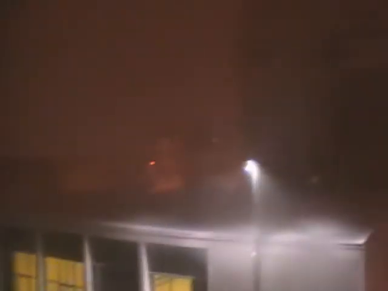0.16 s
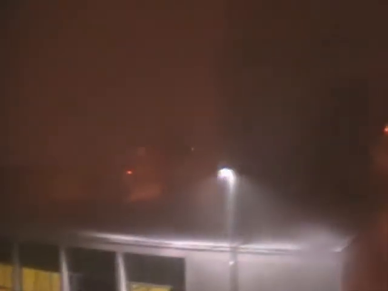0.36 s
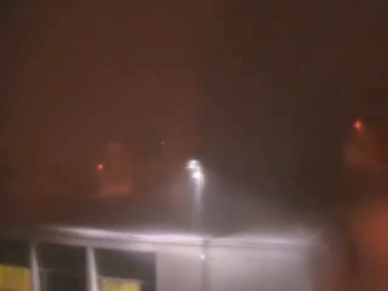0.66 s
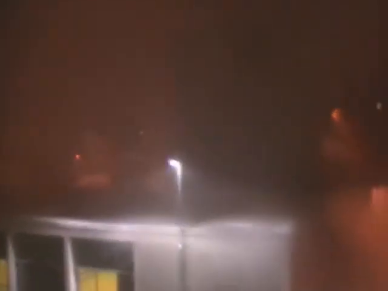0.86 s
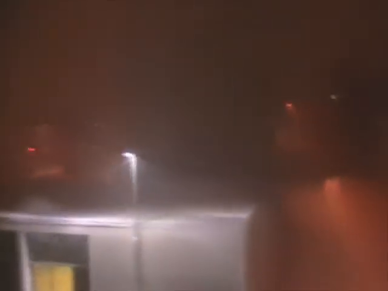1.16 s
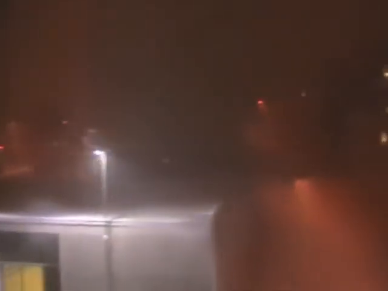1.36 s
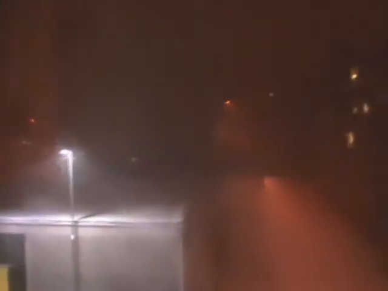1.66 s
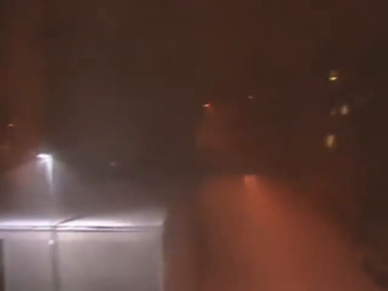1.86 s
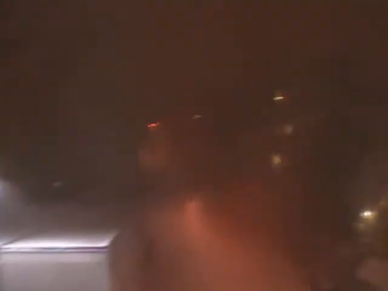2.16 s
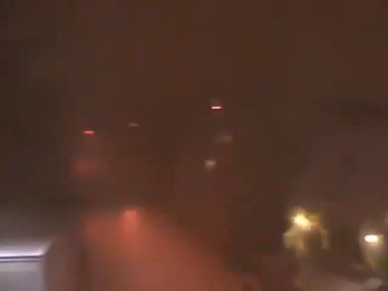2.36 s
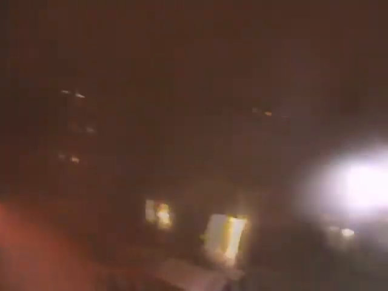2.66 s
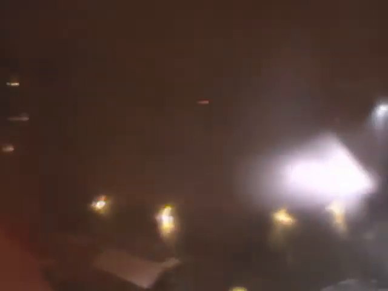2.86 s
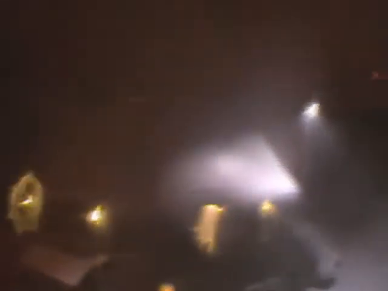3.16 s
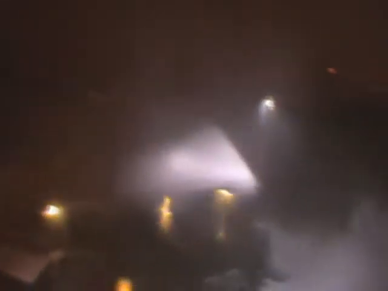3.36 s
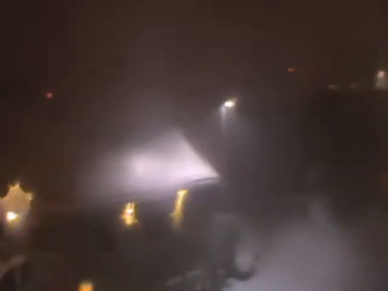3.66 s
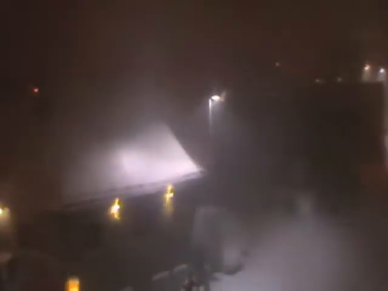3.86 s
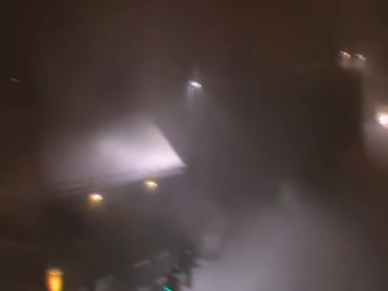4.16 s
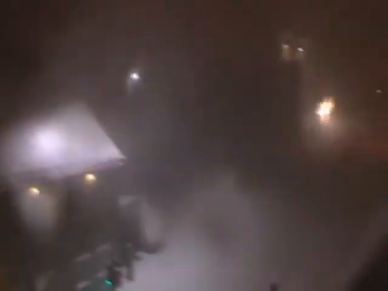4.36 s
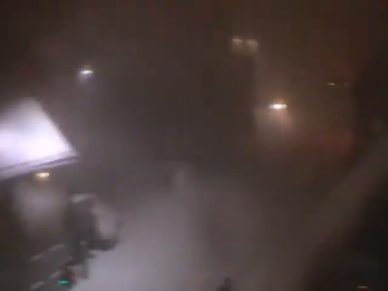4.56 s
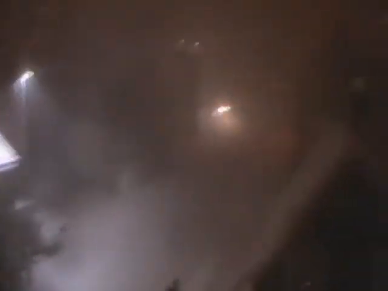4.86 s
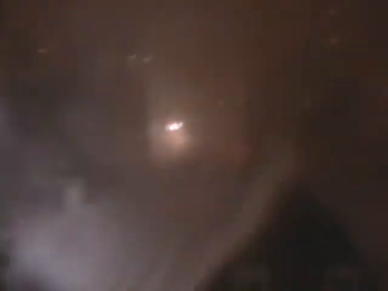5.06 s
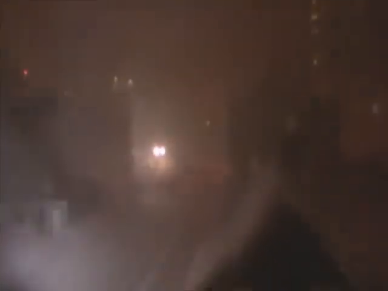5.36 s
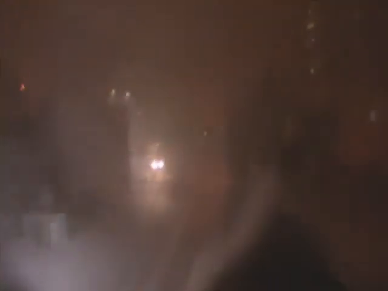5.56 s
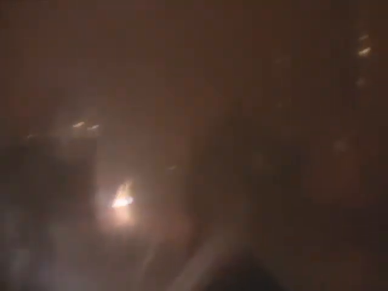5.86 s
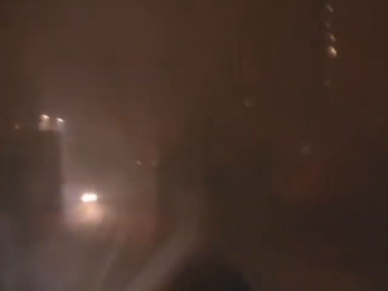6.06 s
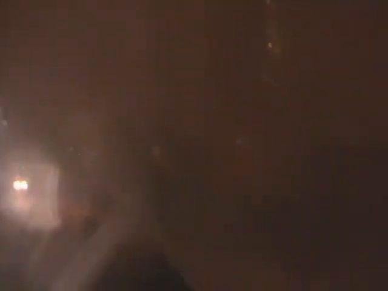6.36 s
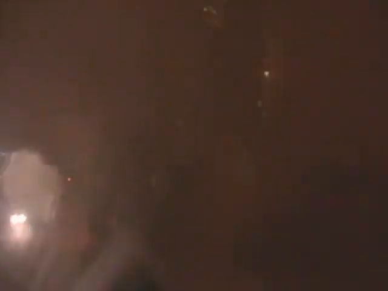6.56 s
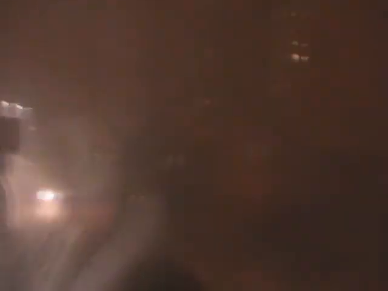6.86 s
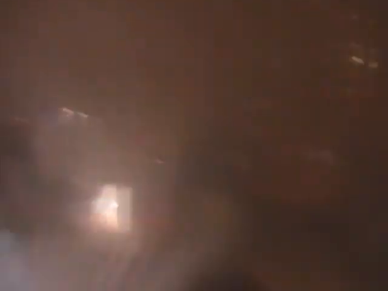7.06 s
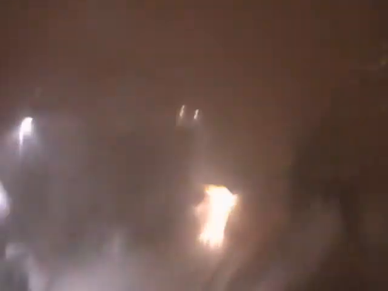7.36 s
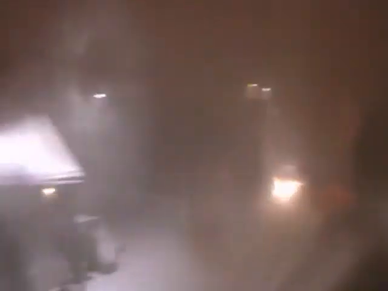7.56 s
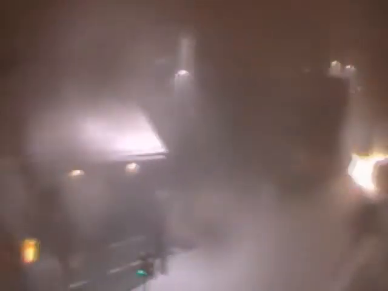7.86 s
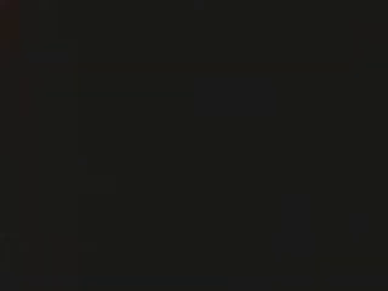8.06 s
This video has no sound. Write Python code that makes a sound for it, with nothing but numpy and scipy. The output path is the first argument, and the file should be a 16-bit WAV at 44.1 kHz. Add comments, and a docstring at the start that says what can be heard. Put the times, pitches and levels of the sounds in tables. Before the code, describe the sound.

Night blizzard outdoors: low wind rumble and fluttering blasts first, then hard, crisp ice ticks scattering across the microphone casing, with a distant smooth roar.

```python
"""A blizzard at night: buffeting wind, tearing rasps and sharp ice ticks at a small camera out in the open.
Gusts shape low noise at the two microphone ports and a fluttering rasp at the casing; single eddies slap in puffs.
Ice pellets are short noise blows through resonances, with a faint grainy halo round the large ones and a few rings.
Fine snow hisses past as noise and tiny clicks; further off the storm is a smooth roar with gliding wind tones."""
import sys
import numpy as np
from scipy import signal
from scipy.fft import rfft, irfft, next_fast_len
from scipy.io import wavfile
from scipy.ndimage import uniform_filter1d

SR = 44100
rng = np.random.default_rng(int(sys.argv[2]) if len(sys.argv) > 2 else 0)


def waveform_to_disk(signal):
    """Save audio, clipped to [-1, 1], as 16-bit WAV at the path in sys.argv[1]."""
    frames = np.transpose(np.atleast_2d(signal))
    scaled = np.clip(frames, -1, 1) * 32767
    samples = np.round(scaled).astype(np.int16)
    wavfile.write(sys.argv[1], SR, samples)


N = 362502
TIME = np.arange(N) / SR

# thickness of the fine driven snow: t/s, level/dB before the layer trims
SNOW_LEVEL = [(0, -70.5), (.4, -72.5), (.6, -67), (1.25, -64.5), (1.9, -70), (2.4, -63.5), (3.3, -67),
              (3.55, -60.5), (3.85, -60.5), (4.7, -62), (5.55, -62), (5.75, -67), (6.4, -65), (6.6, -58.5),
              (7.35, -64), (8.15, -55)]
THICK_SNOW_DB = -59  # snow level that counts as thick
# large ice pellets on the casing; knock and ring pitch are set separately for each pellet:
# t/s, level/dB, knock/Hz, ring/Hz, ring/dB, body/dB, crack/dB (all three relative to the knock), left over right/dB
LARGE_PELLETS = [(1.2324, -40.5, 1800.0, 7300, 3, 16, 7, 2.5), (1.83, -29.5, 1780, 7230.0, -9, 15, -14, 14),
                 (1.8743, -58, 1800.0, 2790.0, 17, 9, -15, 7.5),
                 (1.9944, -49, 1770, 2880, -19, -22.5, -29, 9.5), (2.567, -26, 2460, 2420, 1, 0, -14, -3),
                 (2.6015, -32.5, 4720.0, 2320, 12, 11, 2, 7), (2.715, -38, 2100, 7200, -8, 13, 6, 0),
                 (2.7358, -27.5, 2910, 5900, -5, 2, -2, -6), (2.8633, -30, 4640, 3700, 2.5, 4.5, -3.5, -7),
                 (3.0838, -19, 6700, 3540, 11, 6.5, 10.5, -1.5), (3.1456, -29, 2100, 3780, 4, -1, -2, -4.0),
                 (3.1839, -15.5, 3470, 3620, 6.5, 4, 1, 0), (3.1905, -12, 2860, 1640, 1.5, 4.5, -2.5, -5),
                 (3.2265, -37, 3400, 4800, -10, -21.5, -7, -2.5),
                 (3.325, -34, 2350, 3070, -13, 16, -31, -3), (3.4017, -22, 2030, 2200, -8, -6, -3.5, 4.5),
                 (3.449, -41, 3380, 5000, -16, -8, 2, -8), (3.626, -45.5, 4020.0, 5060, -3, -16.5, 4, -12),
                 (3.7832, -17.5, 2500, 4400, -2.5, 0.5, -1, 5), (3.822, -37, 3400, 3700, -4, 4, 0, 0),
                 (3.895, -14, 4720.0, 3000.0, 4, 6.5, 0.5, -4.5),
                 (3.9717, -34, 5540.0, 1490, 15, 6, -11, 0), (4.154, -40.5, 2900, 3700, -12, 0, 2, -1),
                 (4.209, -39, 2900, 3730, -5, 1, -6, 1), (4.244, -36.5, 2910.0, 5200.0, -11, -16, -6, -2.0),
                 (4.291, -36.5, 4020.0, 8300, -17, 6, -23, 0), (4.361, -43, 4000, 3630, 2, -17, 2, -2),
                 (4.576, -38, 2900, 3700, -7, 4, -7, -1), (4.5909, -34, 2910.0, 7460, -15, 3, -9, -9),
                 (4.6041, -18, 2040, 4740, -3, -12, -4.5, 10), (4.7232, -33, 2090, 7300, -7.0, -1, -4, -1),
                 (4.779, -32, 3400, 4970, 0, 7, -4, 0), (4.7844, -18.5, 2080, 6250, -10, -6, -2.5, 6),
                 (4.7973, -31, 2480.0, 2920, 16, 4, -11, -12),
                 (4.901, -43, 6500.0, 5390.0, -4, 4, -19.0, -8),
                 (4.9099, -34, 1800.0, 7230.0, -14, 14, 4.0, 1),
                 (5.021, -29.5, 1800, 4500, -15, 9, -11, -2), (5.033, -52, 4700, 6000, -5, -12, 0, -2),
                 (5.0501, -14.5, 1840, 6320, -5.5, 1.5, -4.5, -2),
                 (5.157, -40, 2110.0, 3460, 2.5, 6, 10, -3),
                 (5.2165, -37.5, 2910.0, 2500.0, -4, -13, 7, 0.0),
                 (5.2672, -36.5, 1790, 3300, -12, -26, -7, 10),
                 (5.287, -38.5, 2480.0, 7780.0, -2, -13.5, 7, -3),
                 (5.3305, -17.5, 1970, 4770, -3, -25, -8.5, 5), (5.42, -33.5, 2900, 7230.0, -15, 1, -8, 7),
                 (5.489, -43.5, 3400, 7200, -5, -1, 0, 1), (5.548, -25.5, 2140, 5740, -12, -7, -14, 9),
                 (5.575, -40, 3400, 7200, -5, -7, 4, 1), (5.595, -23, 3260, 2540, -1, -8, -9, 11),
                 (5.615, -35, 1800.0, 5600, -10, -13.0, 3, -15),
                 (5.628, -31, 2100, 7780.0, -22, -1, -4, -5), (5.774, -16, 5600, 2770, -2.5, -8, -3, 3),
                 (5.792, -12.5, 4520, 2650, -7, -12.5, -20, -1.5),
                 (5.8735, -30.5, 2480.0, 4970, 5.5, -10.0, 4.5, 8),
                 (5.9016, -37.5, 2930, 8900, -12.0, -15, -8.0, 8),
                 (5.919, -34.5, 2110.0, 5840, -9, -13, -10, -8),
                 (5.9633, -29.5, 5540.0, 5200.0, -13, -5, -20.5, -4),
                 (5.9741, -18, 1810, 4350, -4.5, -7, -4, 7), (5.9789, -23, 4720.0, 2790.0, -11, -17, -1, 7),
                 (5.999, -34, 1800.0, 3120.0, -2, -25, -3, -5), (6.0677, -29, 1760, 2800, -9, -14, 2.5, -4),
                 (6.131, -43, 4000, 4600, -14, -10, -5, 1), (6.161, -24.5, 1760, 4300, -10, 2, -6, 9),
                 (6.181, -38, 2400, 3200, -6, 7, -18, -6), (6.236, -16, 4860, 2460, -4, -2.5, -3, 7.5),
                 (6.3031, -21.5, 3400, 7840, -5, -12, -8, 13), (6.306, -23.5, 5750, 3000, -7, -10, -24, -6),
                 (6.3509, -36, 1780, 2400, -2, 3, -29, -5), (6.58, -31.5, 4640, 8600, -8, -22.5, -21, 9),
                 (6.5925, -33, 3420.0, 4660.0, -8, -14, -4, 14),
                 (6.6023, -31.5, 1800.0, 2880, 7, 1, -9.0, -1),
                 (6.6507, -40.5, 2910.0, 6500, -5.5, -20.0, -1.5, 8),
                 (6.753, -26.5, 2110.0, 4490.0, -10, -12, 5, -12),
                 (6.7623, -29, 2910.0, 4570, -7, -1, -7, 11), (6.798, -46, 3400, 3700, -2, -12, -16, 3),
                 (6.8353, -20.5, 3150, 4520, -8, -19, -7, 5.5), (6.936, -38.5, 3400, 7200, -5, 8, 6, -2),
                 (7.001, -42, 4000, 7300, 0, 3, 0, -4), (7.0603, -34, 2840, 4530, 1, 2, -13, 11.5),
                 (7.079, -36.5, 2110.0, 5010.0, -17, -22.0, -10, -7),
                 (7.0953, -28.5, 4900, 2600.0, -2, -7, -11, 12),
                 (7.231, -31, 2910.0, 7230.0, -11, -13, -22.0, 10),
                 (7.2398, -10, 3370, 2460, 11, 10, -3.5, 0.5), (7.245, -19.5, 2910.0, 4600, 1, 2.5, -4, 30),
                 (7.264, -34, 4720.0, 2240.0, -1, -10.5, 5, -5.0), (7.287, -35, 2100, 6200, -5, 16, 6, 1),
                 (7.3, -39.5, 4000, 4600, -1, -8, -1, 11), (7.322, -23.5, 1800.0, 4530, -12, -1, -16, 10.0),
                 (7.3376, -10.5, 5400, 2400, -2.5, -3, -24, 0),
                 (7.364, -31.5, 2870, 5050, -2, -19.5, -5, 11), (7.375, -38, 2900, 3700, -5, 2, -10, 2),
                 (7.407, -10, 4600, 8200, -10, 1, -22, -1), (7.4146, -22, 2930, 5700, 1, -1, 2, -3),
                 (7.477, -33, 2450, 9000.0, -20, -5, -18, 6), (7.525, -37.5, 4150, 1670.0, -4, -12, -5, 20),
                 (7.647, -48, 3400, 5030, -9, -8, -4, 0), (7.7389, -17, 2860, 1580, 0, 2, -32, 7.5),
                 (7.786, -15, 2270, 7860, -14, -11, -15, 5), (7.8299, -21.5, 1790, 5960, -5, -1, -4, 5),
                 (7.835, -18.5, 3420.0, 1610.0, -5, -21, -4, 12),
                 (7.8596, -23.5, 5540.0, 3120.0, 5, 1, 1, 6), (7.9152, -23, 2430, 4870, -9, -3.5, -10, 7)]
# spectrum of air tearing off the casing: f/Hz, relative density/dB
TEARING_COLOUR = [(200, -45), (420, 6.5), (600, 3.5), (900, 4.5), (1200, 5.5), (1600, 2.5), (2400, -11),
                  (3300, -17), (5000, -36), (8000, -37.5), (13000, -86)]
# spectrum of fine snow, also used for the halo and the spray: f/Hz, relative density/dB
POWDER_COLOUR = [(1000, 9.5), (2500, 14), (3700, 11.5), (4800, 6), (6000, 6), (7500, 6.5), (9500, 1),
                 (11000, 1.5), (13000, 0)]


def wind():
    """Levels in dB of the buffeting and of the rasp: the short gusts add their power to the changing wind beneath."""
    # slowly and suddenly changing buffet level beneath the short gusts: t/s, level/dB
    base_buffet = [(0, -33.5), (.45, -36.5), (.9, -34), (1.15, -34), (1.72, -34.5), (2.15, -36),
                   (2.7, -35.5), (3.0, -32), (3.33, -49), (3.72, -50.5), (3.9, -28.5), (4.12, -33.5),
                   (4.35, -33.5), (5.0, -36), (5.1, -47), (5.36, -51.5), (5.5, -46), (6.6, -40.5),
                   (7.8, -47.5), (8.22, -75)]
    # slowly and suddenly changing rasp level beneath the short gusts: t/s, level/dB before the rasp trims
    base_rasp = [(0, -66.5), (.8, -65), (1.15, -49), (1.4, -66), (1.7, -60.5), (2.02, -38), (2.11, -39),
                 (2.175, -44), (2.22, -41), (2.52, -38.5), (2.7, -62), (3.4, -58), (4.5, -60.5), (5.7, -70),
                 (6.3, -58), (7.1, -58), (7.6, -56.5), (8.22, -55)]
    # short gusts on top: crest t/s, length/s, buffet level/dB, rasp level/dB before the rasp trims
    gust_rows = [(.01, 0.031, -27, -52), (1.085, 0.027, -32, -40), (1.242, 0.036, -30.5, -39),
                 (1.29, 0.084, -47, -48), (1.491, 0.052, -45, -44), (1.564, 0.099, -35.5, -49.5),
                 (1.873, 0.031, -46, -29.5), (1.991, 0.065, -39, -35.5), (2.18, 0.023, -28, -60),
                 (2.239, 0.041, -36, -26), (2.263, 0.021, -34, -25.5), (2.317, 0.053, -39.5, -28),
                 (2.538, 0.057, -36.5, -41.5), (2.876, 0.15, -33, -51.5), (3.292, 0.036, -39, -72),
                 (3.467, 0.028, -47, -70), (3.573, 0.046, -50, -72), (5.151, 0.051, -29, -55),
                 (5.263, 0.082, -30, -62), (5.568, 0.2, -32, -54.5), (5.706, 0.12, -33, -50),
                 (5.92, 0.14, -35, -59), (6.215, 0.12, -31, -49), (6.435, 0.045, -35.5, -70),
                 (6.569, 0.088, -32.5, -38.5), (6.672, 0.028, -37, -35), (6.729, 0.031, -31.5, -36),
                 (6.813, 0.046, -34.5, -65), (6.977, 0.056, -30.5, -43), (7.109, 0.027, -35.5, -39.5),
                 (7.241, 0.094, -35.5, -46), (7.45, 0.14, -39.5, -52), (7.552, 0.029, -30, -67),
                 (7.968, 0.11, -41, -69), (8.072, 0.035, -28, -33.5), (8.183, 0.15, -32.5, -45)]
    buffet_power = from_db(curve(base_buffet)) ** 2
    rasp_power = from_db(curve(base_rasp)) ** 2
    for crest_s, length_s, buffet_db, rasp_db in gust_rows:
        swell_power = surge(crest_s, length_s) ** 2
        buffet_power += from_db(buffet_db) ** 2 * swell_power
        rasp_power += from_db(rasp_db) ** 2 * swell_power
    return 10 * np.log10(buffet_power), 10 * np.log10(rasp_power)


def buffeting(buffet_db, rasp_db):
    """Lumpy low pressure swings, nearly the same at both ports; in fast air the eddies get smaller and lose bass."""
    # spectrum of the pressure swings: f/Hz, relative density/dB
    swing_colour = [(20, -69), (50, -57), (80, -25), (125, -13.5), (200, -4), (300, 0), (420, -2),
                    (505, -7), (580, -20), (700, -15.5), (1200, -43), (3000, -72)]
    lumps = from_db(2.7 * drift(38.7))
    eddies = steadied(coloured(stereo_noise(side_db=-28.0), swing_colour) * lumps)
    small = high_pass(eddies, 280, order=1)
    # the rasp level, smoothed over 0.2 s, stands for the speed of the air
    fast = np.clip((uniform_filter1d(rasp_db, size=8820) + 53.0) / 13, 0, 1)
    eddies = (1 - fast) * eddies + from_db(6.5) * fast * small
    return from_db(buffet_db) * eddies * panned(2.15)


def rasping(rasp_db):
    """Fluttering turbulence, separate at each port in the treble; the hardest blasts are denser and gain a bright edge."""
    apart_hz, side_db = 710, -1.5  # above this pitch each port has its own eddies
    lee_hz, left_db = 1290, 2.5  # the right port lies in the lee and hears a duller rasp
    # harder blasts flutter less
    flutter_db = np.interp(rasp_db, [-36, -28], [4.4, 1.8]) * drift(85)
    level_db = rasp_db - .5 + flutter_db - uniform_filter1d(flutter_db, size=2200)

    mid, side = rng.standard_normal((2, N))
    side = from_db(side_db) * high_pass(side, apart_hz, order=3)
    air = coloured(np.array([mid + side, mid - side]), TEARING_COLOUR)

    edge_colour = [(1000, -22), (2300, 10.0), (3300, -3.0), (5000, -16), (7000, -27.0), (13000, -59)]
    edge = coloured(stereo_noise(side_db=-0.5), edge_colour)
    edge_db = np.minimum(3.0 * (level_db + 27.5), -5)  # relative to the air noise
    left, right = air + edge * from_db(edge_db)
    right = right - 0.48 * high_pass(right, lee_hz, order=1)
    return from_db(level_db + 4.5) * np.array([left, right]) * panned(left_db)


def slaps():
    """An eddy bursts on the ports: a low puff that dies in a few cycles, with a tearing edge of its own level."""
    # single eddies: t/s, level/dB, puff f/Hz, tearing edge relative to the puff/dB
    slap_rows = [(.142, -35.5, 447, -1), (0.479, -40.5, 500, 7.5), (0.58, -27, 394, -15),
                 (.812, -47, 500, 9), (.952, -42, 500, 3), (1.09, -30, 450, -5), (1.146, -36, 480, -2),
                 (1.181, -39, 480, -1), (1.277, -36, 480, 2), (1.233, -40, 450, 5), (1.328, -45, 450, 10),
                 (1.356, -43, 500, 8.5), (1.452, -42, 497, 11.5), (1.826, -21, 457, -15),
                 (1.968, -23, 407, -16), (2.172, -29, 327, -21), (2.649, -36.5, 524, 3.5),
                 (2.843, -37, 523, 2), (2.897, -21, 380, -7), (2.924, -37, 480, 2), (3.892, -25, 406, -6),
                 (4.386, -23, 460, -15), (4.398, -29.5, 400, -22), (5.047, -22.5, 390, -7),
                 (5.656, -21.5, 387, -22), (5.698, -36, 450, -7), (5.72, -31, 454, 2),
                 (5.742, -22, 316, -16), (6.503, -31, 490, 8), (6.519, -31, 500, -9),
                 (6.546, -17, 526, 1.5), (6.559, -18, 484, -8), (6.599, -19, 715, -21),
                 (6.633, -26, 373, -25), (6.674, -41, 500, 8), (6.965, -19, 400, -34),
                 (6.981, -25.5, 376, -23), (7.043, -38, 550, 6.5), (7.403, -17, 460, -27),
                 (8.07, -21.5, 477, -22), (8.161, -20, 308, -12.5)]
    rise_s, relative_width, size = 0.0026, 0.67, 2048
    puffs, tear = np.zeros(N + SR), np.zeros(N + SR)
    age = np.arange(size) / SR / rise_s  # in rise times
    swell = age * np.exp(1 - age)
    for s, db, hz, edge_db in slap_rows:
        at = slice(int(s * SR), int(s * SR) + size)
        burst = evened(swell * rng.standard_normal(size))
        puff = hump(burst, hz, relative_width * hz)
        puffs[at] += from_db(db) * puff * np.sqrt(np.mean(swell ** 2))
        tear[at] += from_db(db + edge_db) * swell
    tearing = tear[:N] * coloured(stereo_noise(side_db=-2.5), TEARING_COLOUR)
    return (puffs[:N] + tearing) * panned(2.3)


def pellets():
    """Each tick rises and fades within a millisecond or two; the casing rings briefly."""
    out, size, lead = np.zeros((2, N)), 1024, 220  # lead: samples before the peak
    age = (np.arange(size) - lead) / SR
    rise = np.exp(-abs(age) / .00025) + from_db(-17) * np.exp(-abs(age) / .0013)
    fade = np.exp(-abs(age) / .00045) + from_db(-18) * np.exp(-abs(age) / .0017)
    contact = np.where(age < 0, rise, fade)
    treble = signal.butter(2, 6000, "high", fs=SR)
    # the blow reaches each port by its own path; only the crack is much alike at both
    alike = np.array([0.73, 0.62, 0.5, 1.74])[:, None, None]  # knock, ring, body, crack
    all_pellets = list(LARGE_PELLETS) + small_pellets()
    for s, db, knock_hz, ring_hz, ring_db, body_db, crack_db, left_db in all_pellets:
        shared = rng.standard_normal((4, 1, size))
        own = rng.standard_normal((4, 2, size))
        force = evened(contact * (own + alike * shared))
        knock = hump(force[0], knock_hz, knock_hz)
        ring = rms_one(resonate(force[1], ring_hz, 390))
        body = hump(force[2], 970, 1670)
        crack = rms_one(signal.lfilter(*treble, force[3]))
        tick = knock + from_db(ring_db) * ring + from_db(body_db) * body + from_db(crack_db) * crack
        # equal energy at both ports, counted as rms over 5 ms
        tick = tick / np.sqrt(np.sum(tick ** 2, axis=1, keepdims=True) / (.005 * SR))
        start = int(s * SR) - lead
        out[:, start:start + size] += (from_db(db) * tick * panned(left_db))[:, :N - start]
    return high_pass(out, 360, order=2)


def small_pellets():
    """Random rows like those of the large pellets; thicker snow brings more and louder ones."""
    start_s, per_s = 2.7, 7.6  # onset, and rate in thick snow
    thick_snow_level_db, follows, spread_db = -44, 0.37, 1.5  # follows: dB per dB of snow
    knock_hz, centre_ring_hz, ring_octaves = 3420, 3560, 0.61  # ring spread in octaves
    ring_db, body_db, crack_db, part_spread_db = -3, 2, -20, 4  # body and crack vary
    left_db, left_spread_db = 0.5, 5
    chance, scatter = rng.random((200, 2)), rng.standard_normal((200, 5))
    rows = []
    for k, ((place, luck), (size, pitch, body, crack, side)) in enumerate(zip(chance, scatter)):
        s = start_s + (k + 2 * place) / per_s
        thick_db = np.interp(s, *np.transpose(SNOW_LEVEL)) - THICK_SNOW_DB
        if s < TIME[-1] and luck < from_db(thick_db / 2):
            rows.append((s,
                         thick_snow_level_db + follows * thick_db + spread_db * size,
                         knock_hz,
                         centre_ring_hz * 2 ** (ring_octaves * pitch),
                         ring_db,
                         body_db + part_spread_db * body,
                         crack_db + part_spread_db * crack,
                         left_db + left_spread_db * side))
    return rows


def grainy_halo():
    """A faint grainy noise swells and fades around each listed tick."""
    relative_db, fade_s, rough_db = -25, 0.012, 10.5  # relative to the tick; rise and fall; graininess
    hits = np.zeros(N)
    for s, db, *_ in LARGE_PELLETS:
        hits[int(s * SR)] += from_db(db + relative_db)
    age = np.arange(-SR // 10, SR // 10) / SR
    swells = signal.fftconvolve(hits, np.exp(-abs(age) / fade_s), "same")
    grain = rms_one(from_db(rough_db * drift(240)))
    return swells * grain * coloured(stereo_noise(side_db=-2.0), POWDER_COLOUR)


def rings():
    """A few faint rings, each a sine that dies away exponentially."""
    # single rings: t/s, f/Hz, level/dB, time to fall by 60 dB/s
    ring_rows = [(3.084, 3600, -42, 0.075), (4.827, 3640, -44, 0.034), (5.873, 4650, -49, 0.045)]
    out = np.zeros(N)
    for s, hz, db, t60_s in ring_rows:
        age = np.maximum(TIME - s, 0)
        out += from_db(db - 60 * age / t60_s) * np.sin(2 * np.pi * hz * age)
    return out


def snow():
    """Countless flakes hiss; larger crystals click out of the hiss, sparse in thin snow and dense in thick."""
    crystals_per_s = 380  # in thick snow, before the random swells
    level_db = curve(SNOW_LEVEL)
    thick = np.minimum(from_db(level_db - THICK_SNOW_DB), 1)
    born = rng.random(N) < crystals_per_s * thick * from_db(3.0 * drift(5)) / SR
    sizes = from_db(4.5 * np.minimum(rng.exponential(1, N), 3)) / np.sqrt(thick)
    clicks = born * sizes * from_db(2 * rng.standard_normal((2, N)))
    # each click dies away over about 1 ms
    crumble = signal.lfilter([1], [1, -np.exp(-1 / (.001 * SR))], clicks + 1e-18)
    grains = coloured(crumble * stereo_noise(side_db=-15.0), POWDER_COLOUR)
    hiss = coloured(stereo_noise(side_db=-6), POWDER_COLOUR)
    hiss = hiss * from_db(2.2 * drift(14)) * thick ** .2
    return from_db(level_db) * (from_db(1.5) * hiss + from_db(2.5) * grains)


def soft_spray():
    """A short soft spray of noise around the hit at 3.19 s."""
    spray = np.exp(-np.abs((TIME - 3.19) / .021) ** 3)
    return from_db(-32.5) * spray * coloured(stereo_noise(side_db=-7), POWDER_COLOUR)


def far_storm():
    """Distant turbulence is a smooth roar; wind tones swell out of it, clear or airy, and glide."""
    # roar of the storm: t/s, level/dB before the roar trim
    roar_level = [(0, -62), (.3, -65), (1.15, -58.5), (1.5, -61.5), (2.1, -56.5), (2.43, -48.5),
                  (2.65, -59.5), (3.05, -53), (3.25, -66.5), (3.57, -53), (4.15, -57.5), (4.85, -51.5),
                  (5.6, -57), (5.95, -65.5), (6.6, -55.5), (7.1, -56), (8.22, -54.5)]
    # spectrum of the roar: f/Hz, relative density/dB
    roar_colour = [(80, 5), (250, 12), (600, 13.5), (900, 15.5), (1700, 11.5), (2300, 7), (3200, -3.5),
                   (5000, -30), (13000, -36)]
    # tones of wires, posts and edges:
    # crest t/s, length/s, f at the crest/Hz, glide/(Hz/s), width/Hz, purity (0 airy to 1 clear), level/dB
    whistle_rows = [(3.583, 0.44, 873, 2.5, 16, .5, -57.5), (3.556, 0.21, 2120, -250, 510, 0, -48),
                    (3.6, 0.44, 1178, 1, 22, 0.7, -57.5), (4.4, 1.6, 1730, 79, 220, 0, -61),
                    (5.099, 1.2, 1162, -45, 51, .3, -59.5), (5.462, 0.31, 1800, -59, 410, 0.1, -52),
                    (6.0, 4.3, 873, 0, 45, 0.3, -65), (7.4, 1.3, 1180, 7, 50, 0.1, -64)]
    wander_hz = 3.96
    out = from_db(curve(roar_level) + 5.0) * coloured(stereo_noise(side_db=-17), roar_colour)
    for s, length_s, hz, glide_hz_per_s, width_hz, purity, db in whistle_rows:
        pitch_hz = hz + glide_hz_per_s * (TIME - s) + wander_hz * drift(4.65)
        phase = 2 * np.pi * np.cumsum(pitch_hz) / SR
        airy = drift(width_hz / 2) * np.cos(phase) + drift(width_hz / 2) * np.sin(phase)
        clear = np.clip(purity, 0, 1)
        tone = np.sqrt(2 * clear) * np.cos(phase) + np.sqrt(1 - clear) * airy
        out = out + from_db(db) * surge(s, length_s) * tone
    return out


def casing(x):
    """Reflections round the ports colour everything with a row of notches and a peak."""
    # notches (negative) and a peak (positive): f/Hz, width/Hz, gain/dB
    reflections = [(577, 34, -2.5), (692, 131, -12), (804, 64, -7.5), (1046, 175, -8.5), (1340, 222, -9),
                   (1950, 210, -9), (2235, 135, 1.5), (2548, 124, -10.5), (3142, 270, -6.5)]
    for hz, width_hz, db in reflections:
        x = x - (1 - from_db(db)) * resonate(x, hz, width_hz)
    return x


def from_db(db):
    """Decibels to gain."""
    return 10 ** (np.asarray(db) / 20)


def rms_one(x):
    """Scale to unit rms."""
    return x / np.sqrt(np.mean(x ** 2) + 1e-20)


def curve(rows):
    """Join (s, value) rows by straight lines."""
    return np.interp(TIME, *np.transpose(rows))


def surge(crest_s, length_s):
    """A gain that swells to 1 and fades again."""
    edge = 2.65  # 1 is pointed, 2 a bell, more a flat top
    gain = np.zeros(N)
    near = abs(TIME - crest_s) < 2 * length_s
    gain[near] = np.exp(-abs(2 * (TIME[near] - crest_s) / length_s) ** edge / 2)
    return gain


def panned(left_db):
    """Left and right gains of constant total power; left_db is left over right."""
    return rms_one(from_db(np.array([[.5], [-.5]]) * left_db))


def drift(corner_hz):
    """Smooth chance of unit rms: noise at a 20th of the rate through two equal low-pass poles."""
    r = np.exp(-40 * np.pi * abs(corner_hz) / SR)
    noise = rng.standard_normal(N // 20 + 4002)
    slow = signal.lfilter([1], [1, -2 * r, r * r], noise)[4000:]  # skip the filter's start
    return np.interp(np.arange(N) / 20, np.arange(len(slow)), rms_one(slow))


def coloured(x, spectrum):
    """Weight a sound by a spectrum; rms 1."""
    size = next_fast_len(N)
    hz, db = np.transpose(spectrum)
    bins_hz = np.maximum(np.fft.rfftfreq(size, 1 / SR), 1)
    gain = from_db(np.interp(np.log(bins_hz), np.log(hz), db))
    return rms_one(irfft(rfft(x, size) * gain, size)[..., :N])


def stereo_noise(side_db):
    """White noise shared by both ports, plus a part in which they differ."""
    mid, side = rng.standard_normal((2, N))
    return mid + from_db(side_db) * side * np.array([[1], [-1]])


def high_pass(x, hz, order):
    """Take out what lies below hz."""
    return signal.sosfilt(signal.butter(order, hz, "high", fs=SR, output="sos"), x)


def resonate(x, hz, width_hz):
    """A resonance with unit gain at its top."""
    return signal.lfilter(*signal.iirpeak(min(hz, SR / 3), max(hz / width_hz, .5), fs=SR), x)


def hump(x, hz, width_hz):
    """A broad resonance, passed twice for steeper flanks; rms 1."""
    return rms_one(resonate(resonate(x, hz, width_hz), hz, width_hz))


def evened(burst):
    """Smooth out the chance humps in a short burst's spectrum, so that what it strikes decides the colour."""
    spectrum = rfft(burst)
    power = uniform_filter1d(abs(spectrum) ** 2, size=11)
    return irfft(spectrum / np.sqrt(power + 1e-12))


def steadied(x):
    """Take the slow chance swells out of a noise, so that the wind level alone shapes it."""
    return x / np.sqrt(uniform_filter1d(np.mean(x ** 2, axis=0), size=2600) + 1e-12)


def scene():
    """Wind and ice at the camera, the storm behind."""
    buffet_db, rasp_db = wind()
    near_wind = buffeting(buffet_db, rasp_db) + rasping(rasp_db) + slaps()
    ice = pellets() + grainy_halo() + rings()
    return casing(near_wind + ice + snow() + soft_spray() + far_storm())


def record(dry):
    """The input saturates softly on the hardest ticks; a steep low-pass cuts the top."""
    cutoff_hz = 13400
    clipped = .85 * np.tanh(dry / .85)
    return signal.sosfilt(signal.ellip(10, .2, 70, cutoff_hz, fs=SR, output="sos"), clipped)


dry = scene()
out = record(dry)
waveform_to_disk(out)
```